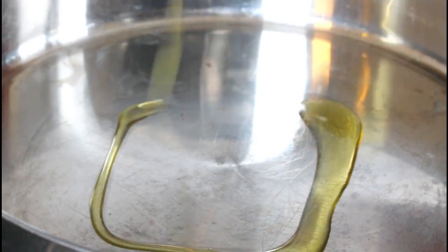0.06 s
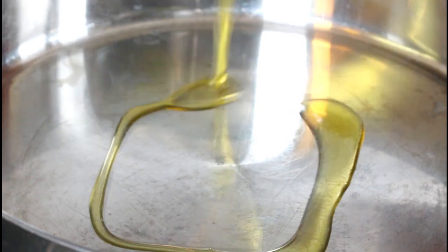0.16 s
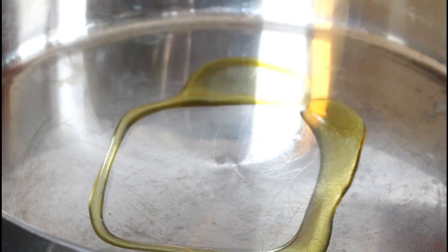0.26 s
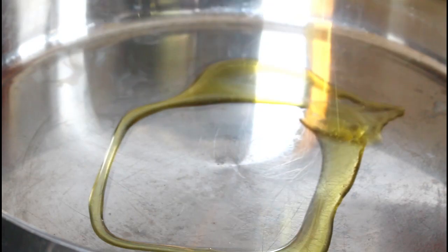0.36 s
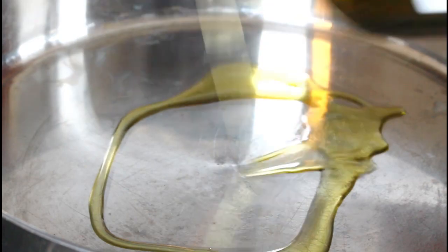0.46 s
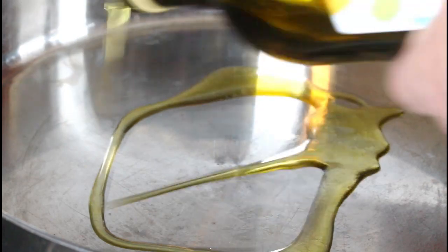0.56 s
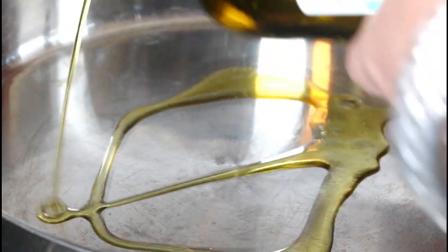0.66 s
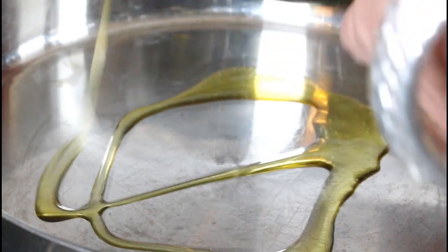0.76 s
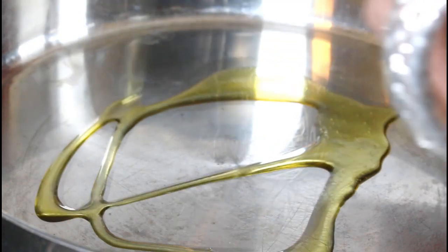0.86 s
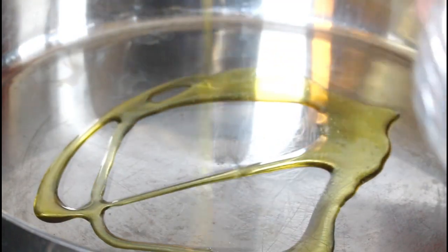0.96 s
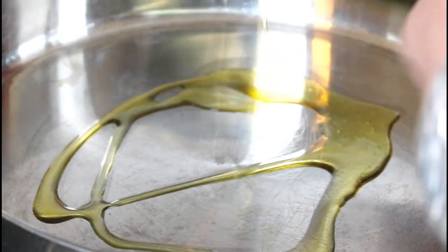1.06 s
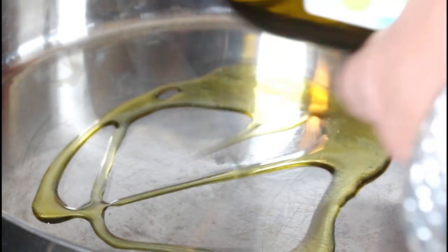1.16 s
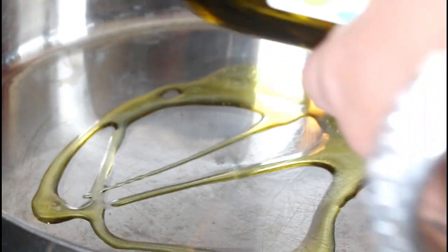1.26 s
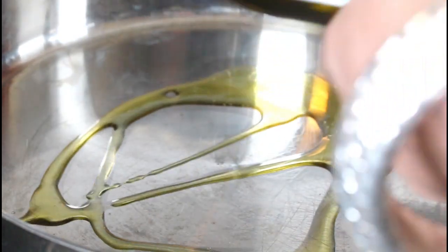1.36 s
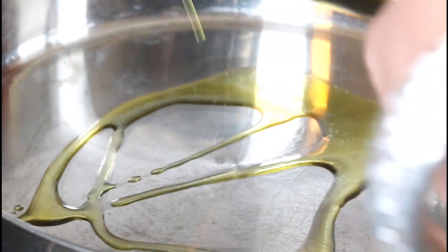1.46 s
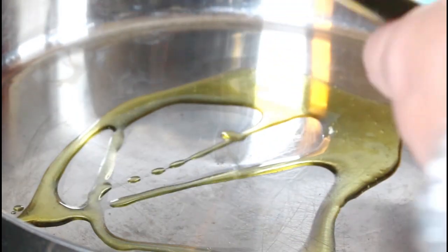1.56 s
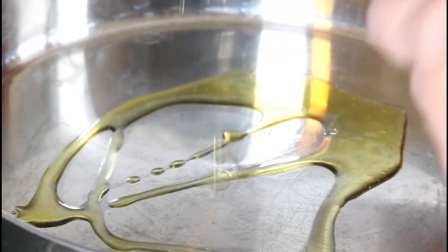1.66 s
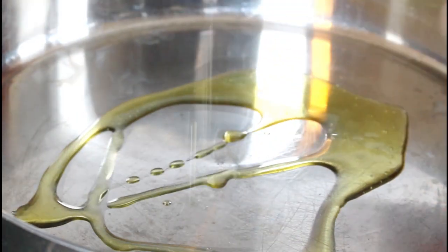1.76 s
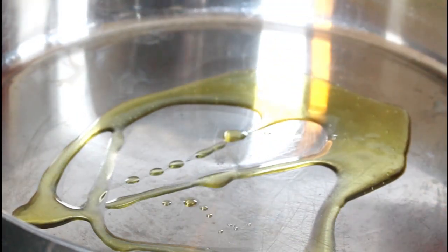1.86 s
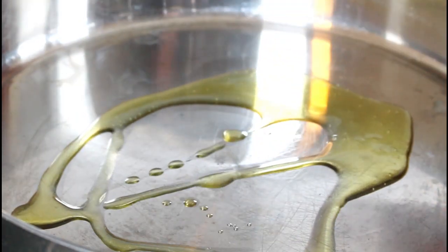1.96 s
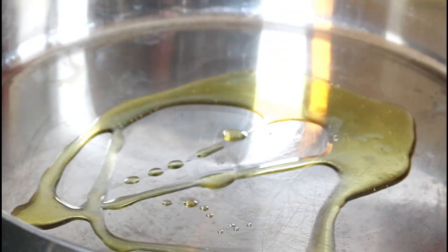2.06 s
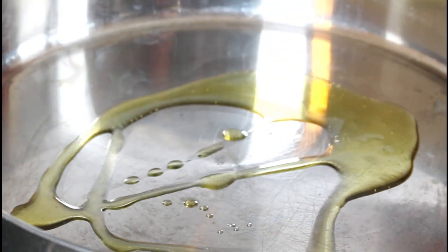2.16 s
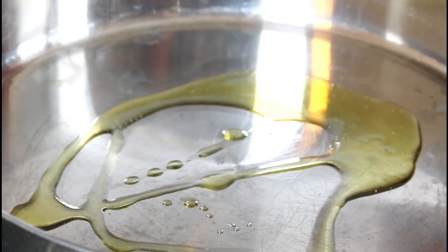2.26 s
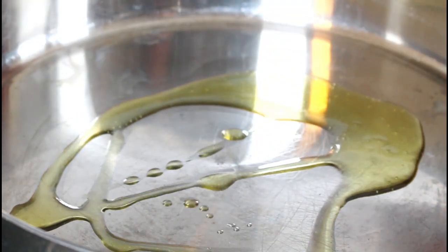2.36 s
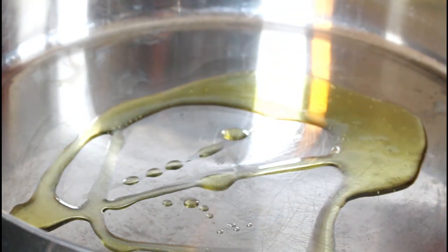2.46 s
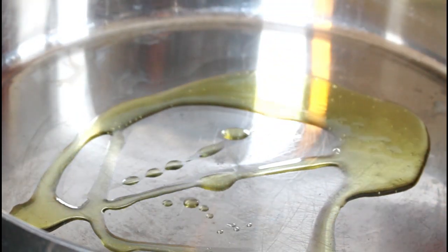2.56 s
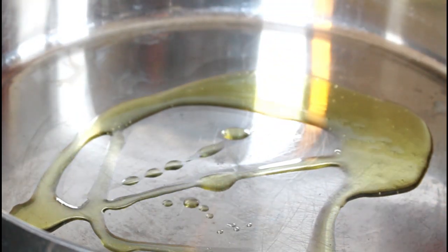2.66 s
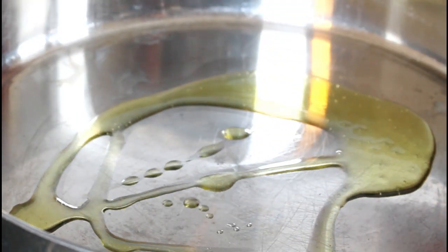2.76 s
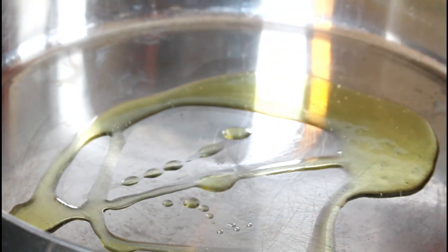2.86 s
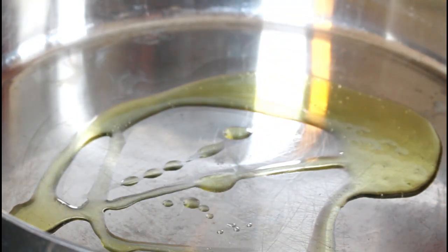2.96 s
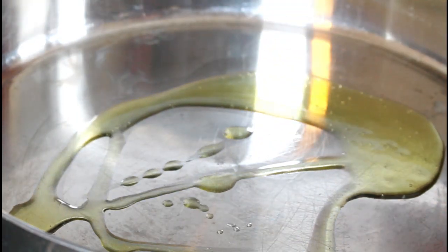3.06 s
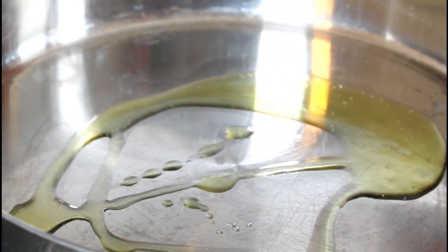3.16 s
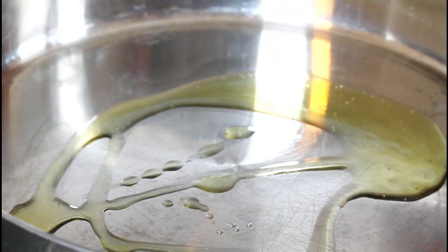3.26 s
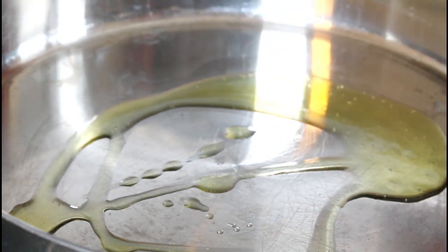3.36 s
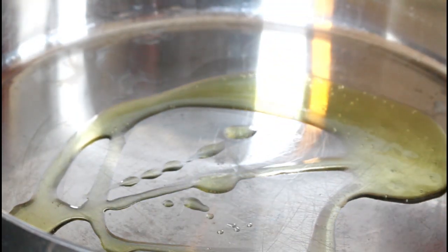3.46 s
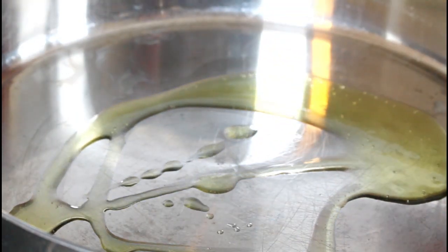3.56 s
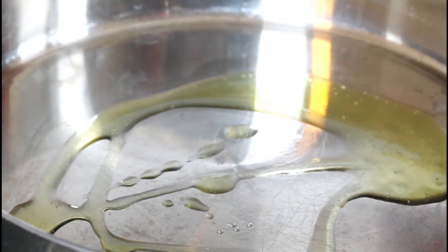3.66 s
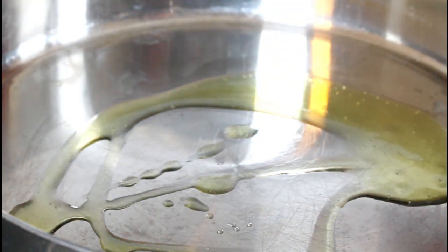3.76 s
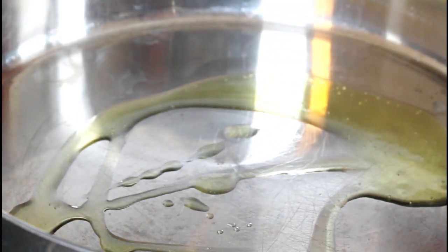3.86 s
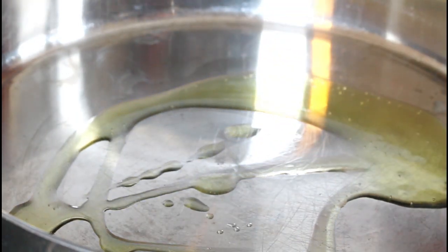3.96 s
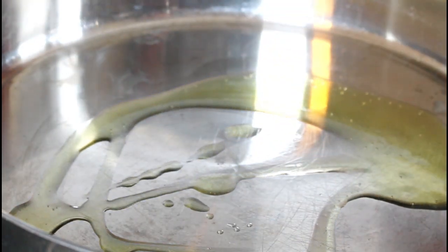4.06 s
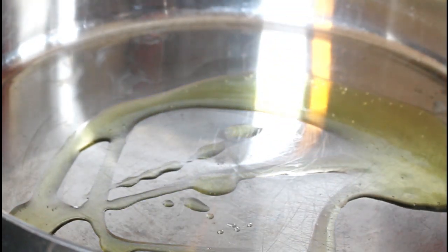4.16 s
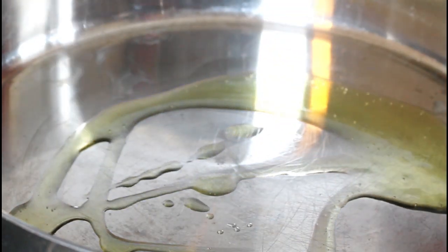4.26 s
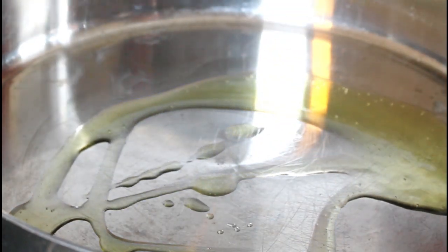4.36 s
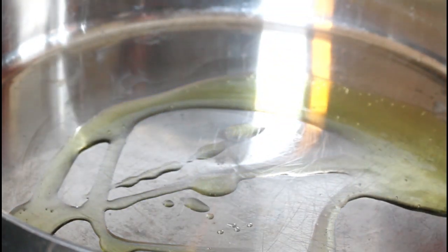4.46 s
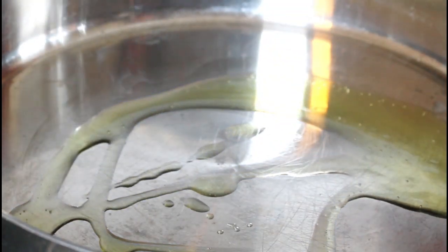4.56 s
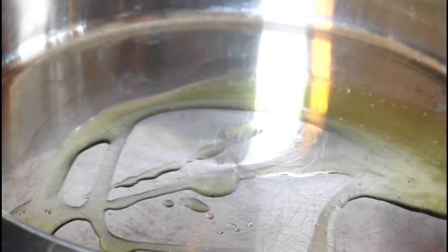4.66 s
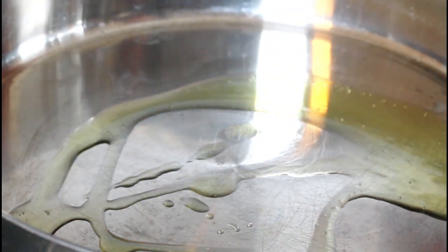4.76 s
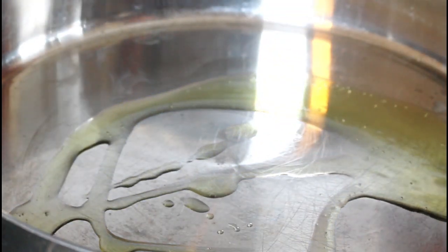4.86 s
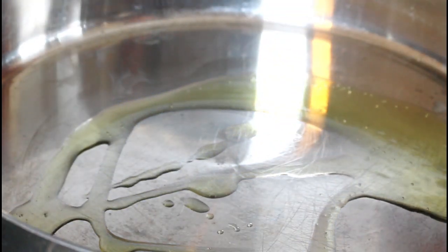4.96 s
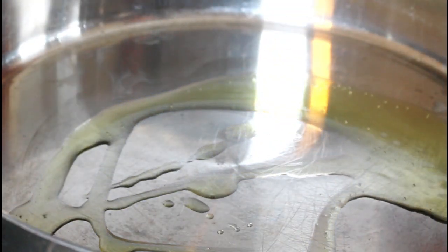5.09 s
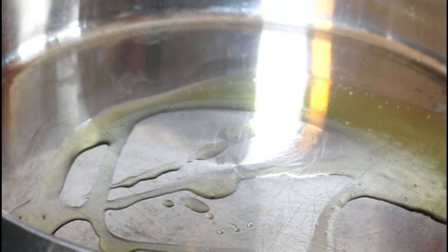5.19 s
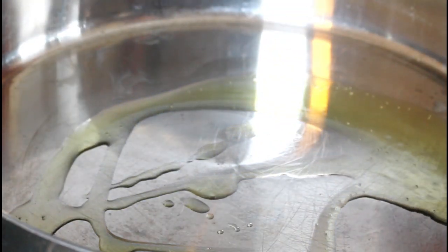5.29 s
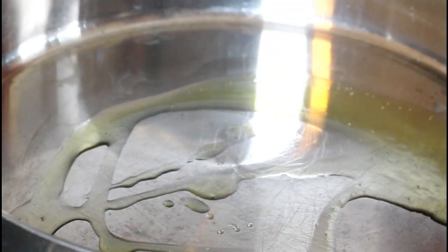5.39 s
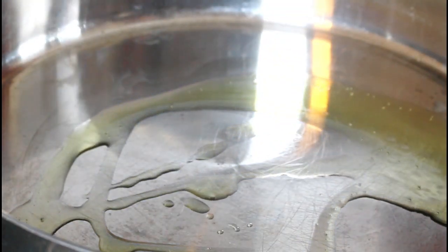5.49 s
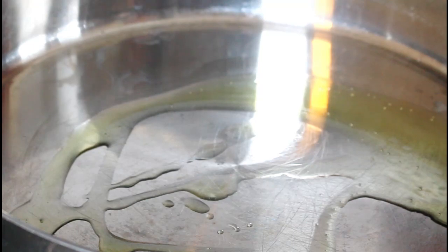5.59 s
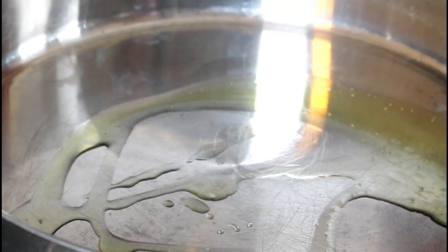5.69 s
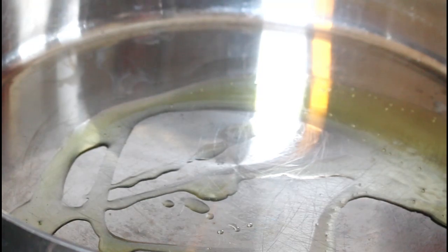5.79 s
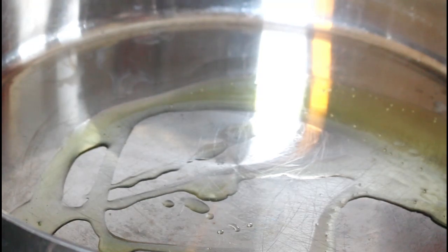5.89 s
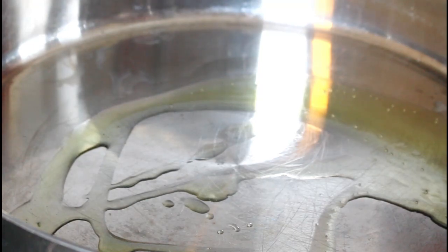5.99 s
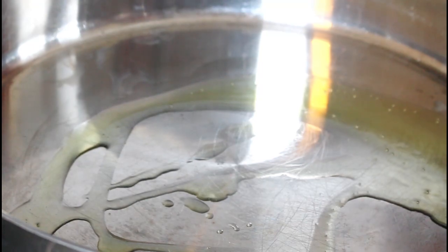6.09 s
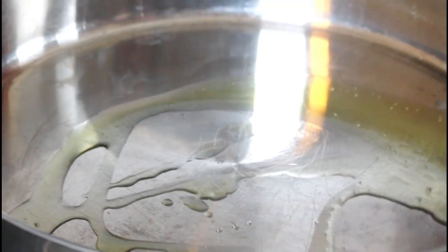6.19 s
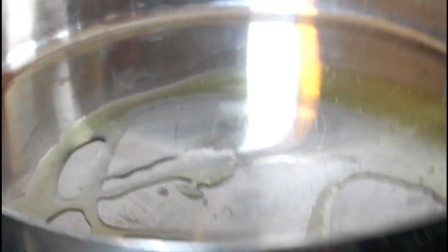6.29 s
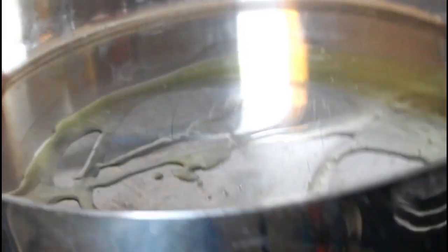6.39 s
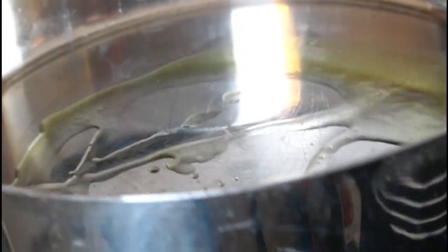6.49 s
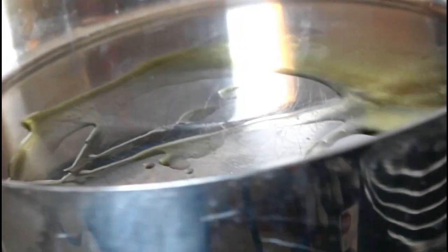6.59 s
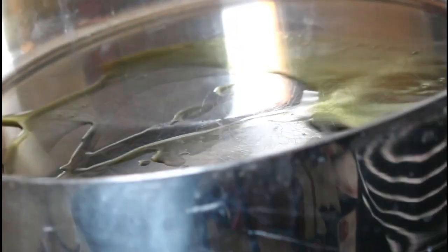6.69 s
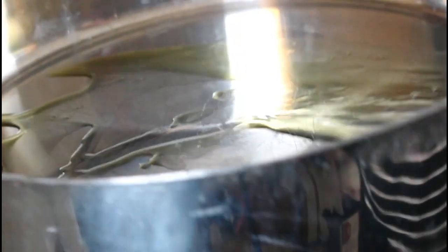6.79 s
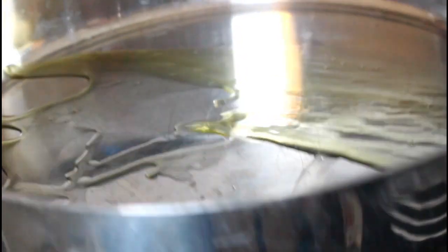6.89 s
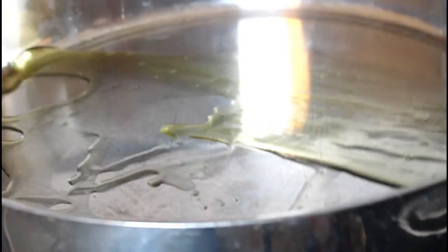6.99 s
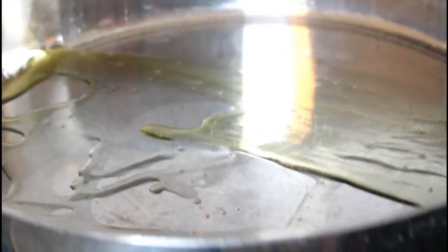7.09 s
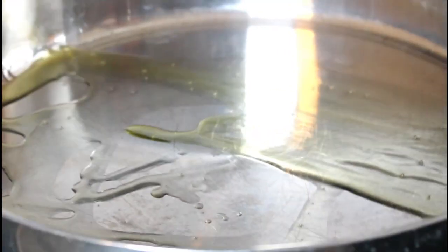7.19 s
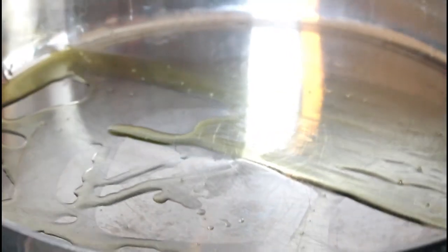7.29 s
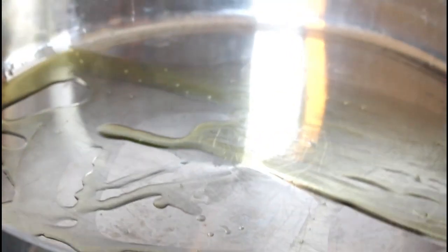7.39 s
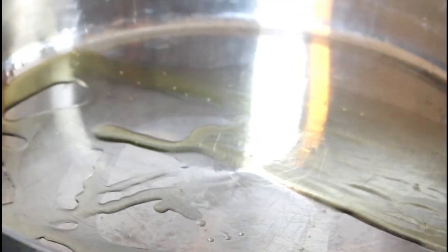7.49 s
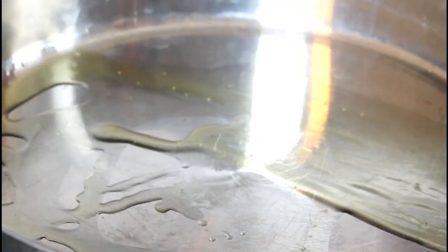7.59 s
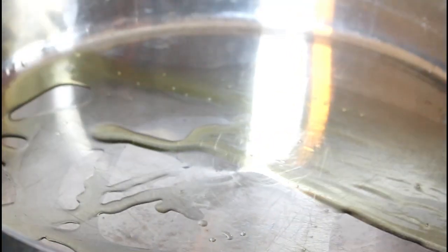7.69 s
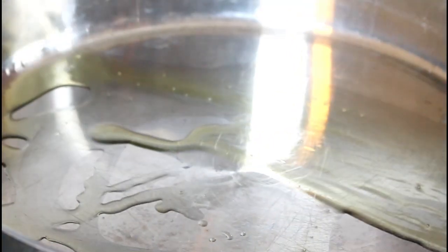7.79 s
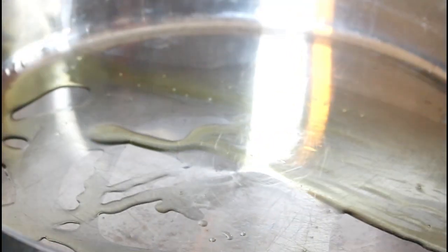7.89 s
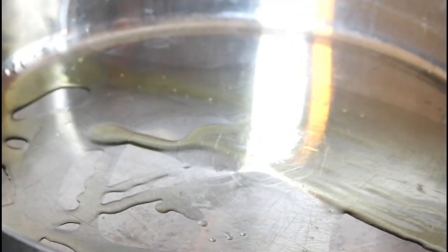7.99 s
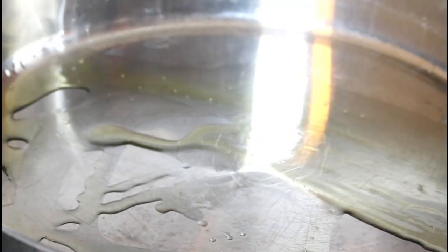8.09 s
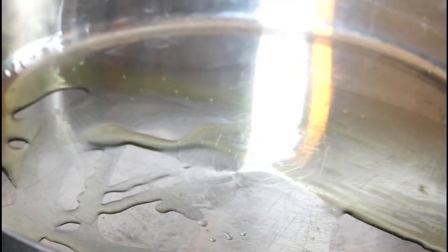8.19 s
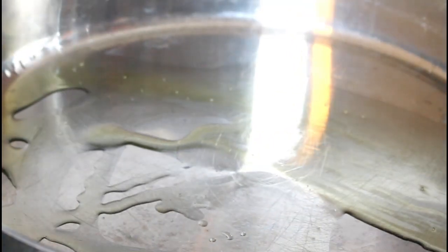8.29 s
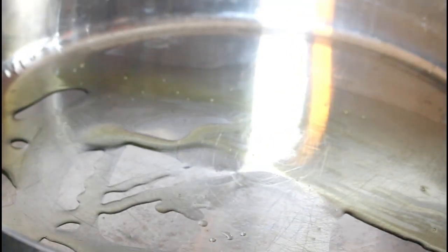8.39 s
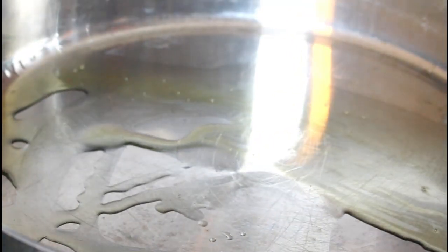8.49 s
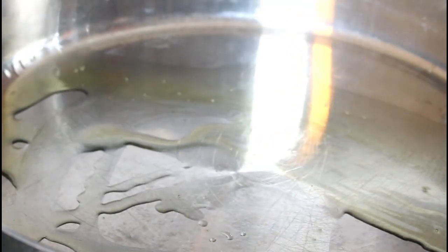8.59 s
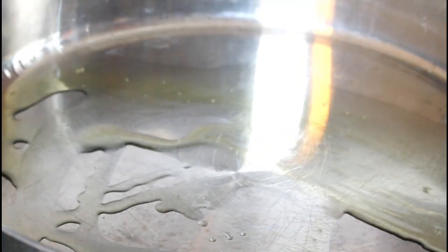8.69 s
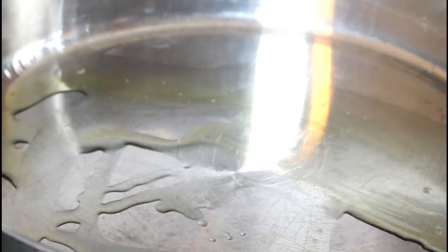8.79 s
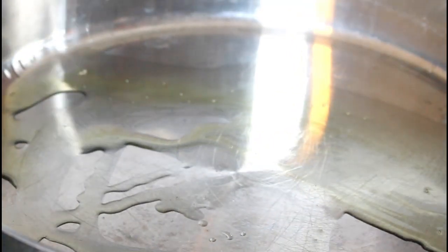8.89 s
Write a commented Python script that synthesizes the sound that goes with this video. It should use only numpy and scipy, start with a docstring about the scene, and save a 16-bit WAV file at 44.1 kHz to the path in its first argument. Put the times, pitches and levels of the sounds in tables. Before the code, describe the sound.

A gas flame hisses and flutters close by under a steel pan for the whole nine seconds, with a faint low motor hum beneath it. Soft hollow pops come often in the first second and a half, then more sparsely. From about 1.4 to 4.5 seconds, the metal cap of an oil bottle clinks lightly and squeaks faintly on its thread, with the clearest clinks near 2.4 and 4.5 seconds. The heating steel gives a few small, bright ticks between 5 and 5.7 seconds. At about 6.2 seconds the pan gives one short, loud knock, the loudest sound, followed by lighter knocks and faint slides on the burner support. Around 7.5 seconds it lands with a brief metallic clatter, rocks quickly to rest and makes the stove rumble softly. The flame carries on to the end. The small kitchen adds very little echo.

```python
"""A gas flame hisses and flutters under a steel pan in a small kitchen, booming and popping softly in the air
gap below the base. A hand turns the metal cap of an oil bottle, which clinks and squeaks on its thread. The hot
steel ticks as it expands. The pan is lifted, knocks and slides on its support, then rocks to rest and shakes
the stove. A low mains hum lingers."""
import sys
import numpy as np
from scipy import signal
from scipy.fft import rfft, irfft, next_fast_len
from scipy.io import wavfile
from scipy.ndimage import uniform_filter1d, minimum_filter1d, map_coordinates

SR = 44100
rng = np.random.default_rng(int(sys.argv[2]) if len(sys.argv) > 2 else 0)


def master(y):
    """Save y as 16-bit WAV."""
    cut = np.clip(np.atleast_2d(y).T, -1, 1)
    pcm = np.round(cut * 32767)  # scale
    wavfile.write(sys.argv[1], SR, pcm.astype(np.int16))


N = 394228

# The flame's level ride. Each row: time in seconds, boom in dB, hiss in dB.
FLAME_RIDE = [(0.0, -42, -49.5), (3.16, -41, -47.5), (8.94, -43.5, -48.5)]
# The broad noise bed of flame and kitchen. Each row: frequency in Hz, spectral level in dB.
ROAR_SPECTRUM = [(12, -50), (20, -14), (53, -18), (74, -18), (171, -17), (306, -4), (352, 3), (427, -15),
                 (534, -15), (767, -16), (958, -18), (1230, -21), (3000, -23), (6360, -27.5), (15500, -66)]
# The whistle of the gas jets. Each row: centre in Hz, width in Hz, gain in dB.
JET_BANDS = [(1862, 67, 3.5), (2880, 360, -3.5), (4038, 134, 5), (4670, 31, 2.5), (6510, 240, -8),
             (8180, 1010, -10.5)]
# The hollow air gap under the pan. Each row: centre in Hz, width in Hz, gain in dB.
GAP_MODES = [(137, 35, -7), (238, 102, -10.5), (365, 48, -0.5), (540.6, 51, -9), (912, 90, -19.5)]
def flame():
    """A steady roar and whistling jets make the hiss; the flutter drives the gap in uneven surges."""
    times, boom_db, hiss_db = np.transpose(FLAME_RIDE)
    t = np.arange(N) / SR
    roar = unit(filtered(rng.standard_normal(N), lambda hz: amp(along(ROAR_SPECTRUM, hz))))
    flicker_db = 0.2 * wobble(4)
    whistle = amp(-4.5 + 1.45 * wobble(25)) * resonant(JET_BANDS)
    hiss = amp(np.interp(t, times, hiss_db) + flicker_db) * (amp(6) * roar + whistle)
    surge_db = 1.5 * wobble(5) + 2.8 * wobble(35)
    boom = amp(np.interp(t, times, boom_db) - 2.5) * unit(amp(surge_db) * resonant(GAP_MODES))
    return hiss + boom


# The body of a pop. Each row: pitch in Hz, gain in dB, 60 dB decay in seconds before gating.
POP_MODES = [(352.4, -1, 0.35), (534, 6.5, 0.057), (923, -5.5, 0.035)]
# The larger pops. Each row: start in seconds, level in dB, offset of overtones and breath in dB.
FLAME_POPS = [(0.009, -27, -7.5), (0.089, -28.5, -21), (0.191, -27, -12.5), (0.391, -23, -16.5),
              (0.612, -30, -14), (0.639, -27.5, -7), (0.746, -21, -13.5), (0.936, -28, -17),
              (1.049, -26, -10), (1.199, -22, -11), (1.326, -25, -14), (1.483, -23.5, -16),
              (1.992, -21, -15), (2.551, -23, -15), (2.724, -27.5, -20), (3.027, -22, -17),
              (3.061, -28, -13), (3.166, -26.5, -1.5), (3.382, -24.5, -14), (3.491, -27.5, -4),
              (4.103, -25.5, -14), (4.637, -25.5, -8.5), (6.035, -25.5, -19), (6.124, -19.5, -11.5),
              (6.572, -27, -11), (8.83, -23, -19)]
def flame_pops():
    """Each pop is a short swell of the gap's main mode, with overtones and a breath of noise."""
    out = np.zeros(N)
    gate_s, detune_hz, settle_s = 0.015, 14.8, 3
    t = np.arange(SR // 20) / SR
    gate = np.exp(-(t / gate_s) ** 4)
    hz, mode_db, t60 = np.transpose(POP_MODES)
    # Small pops come by chance, mostly early, while the flame settles.
    small_pops = [(start % (N / SR), -30, -15) for start in rng.exponential(settle_s, size=8)]
    for start, db, overtone_db in FLAME_POPS + small_pops:
        pitches = hz + detune_hz * rng.standard_normal()
        levels = mode_db + overtone_db * (hz > hz[0])
        tones = ring(pitches, levels, t60, 0.0017, scatter_db=3.5, chatter=0.74, size=len(t))
        add(out, start, amp(db) * tones * gate)
        add(out, start, amp(db + overtone_db - 4) * puff(450, 1160, 0.11, 0.0016))
    return out


# The clang of the pan's base. Each row: pitch in Hz, gain in dB, 60 dB decay in seconds.
BASE_MODES = [(149.6, -2.5, 0.15), (202.3, 2, 0.18), (277.6, -15, 0.35), (344, -3.5, 0.15),
              (472, -0.5, 0.13), (543, 3, 0.094), (640, 2, 0.096), (818, -3, 0.075), (924, -4.5, 0.17),
              (1076, -8, 0.13), (1150, -1.5, 0.1), (1305, -1.5, 0.17), (1410, -15, 0.21), (1650, -8, 0.15),
              (2073, -3, 0.12), (2780, -9.5, 0.1)]
# Blows on pan and stove. Each row: start in seconds, level in dB, thud in Hz, rattle offset in dB.
PAN_KNOCKS = [(4.537, -22, 427, -1.5), (5.673, -33, 900, -5), (5.719, -31.5, 990, 2.5),
              (6.1748, 2, 550, -30), (6.438, -24.5, 348, -13), (6.7, -31.5, 277, -18),
              (7.347, -29, 302, -9), (7.459, -27.5, 344, -9), (7.537, -23, 170, -10),
              (7.545, -14.5, 1220, -15), (7.55, -19, 1400, 1.5), (7.557, -17, 570, -7.5),
              (7.579, -20, 323, -2), (7.589, -25, 400, -14), (7.61, -27, 280, -27)]
# Slides on the support. Each row: start and end in seconds, favoured pitch in Hz, level in dB.
PAN_SLIDES = [(6.399, 6.48, 447, -35), (6.56, 6.78, 250, -47), (7.289, 7.319, 400, -38),
              (7.379, 7.46, 214, -37), (7.473, 7.535, 215, -38), (7.6, 7.803, 200, -47)]
def pan_knocks_and_slides():
    """A blow thuds, rings nearby base modes and rattles the support; a slide feeds the modes noise."""
    out = np.zeros(N)
    hz, mode_db, t60 = np.transpose(BASE_MODES)
    for start, db, thud_hz, rattle_db in PAN_KNOCKS:
        thud_t60 = 0.062 * (300 / thud_hz) ** 2.08  # higher thuds die faster
        octaves = np.abs(np.log2(hz / thud_hz))
        falloff_db = -6 * octaves ** 2 / (1 + octaves)
        thud = ring([thud_hz], [0], thud_t60, 0.0017, scatter_db=0, chatter=0.18)
        clang = ring(hz, mode_db + falloff_db, t60, 0.0019, scatter_db=2, chatter=1.4)
        wash = puff(380, 1410, 0.29, 0.0012)  # dense upper modes blur into noise
        rattle = puff(2520, 5470, 0.054, 0.00095)
        knock = -amp(0.5) * thud - amp(-3) * clang + amp(-14) * wash + amp(rattle_db) * rattle
        add(out, start, amp(db) * knock)
    for start, end, centre_hz, db in PAN_SLIDES:
        bands = [(f, 80, gain - 8 * abs(np.log2(f / centre_hz))) for f, gain, _ in BASE_MODES]
        add(out, start, amp(db) * swell(start, end) * friction(bands, rate=48, rough_db=3))
    return out


SET_DOWN_S, SEATED_S = 7.538, 7.576
def pan_rocking():
    """The base drums on its support, sharper on the push than the rebound, until its weight settles."""
    beat_hz, rise_s, stop_s = 275, 0.003, 0.004
    t = np.arange(SR // 10) / SR
    phase = 2 * np.pi * beat_hz * t
    beats = amp(-13.5) * np.cos(2 * phase) - np.cos(phase)
    rise = 1 - np.exp(-t / rise_s)
    choke = np.exp(-np.maximum(t - (SEATED_S - SET_DOWN_S), 0) / stop_s)
    out = np.zeros(N)
    add(out, SET_DOWN_S, amp(-13) * rise * choke * beats)
    return out


# The cap's ring in three registers. Each row: pitch in Hz, gain in dB.
CAP_LOW_MODES = [(1030, 13), (1490, 8.5), (1640, 7.5)]
CAP_MID_MODES = [(1793, 10), (2130, 15), (2466, -16), (2640, 11.5), (2988, 11), (4210, 4), (4689, 5)]
CAP_HIGH_MODES = [(5410, 1), (5880, 10), (6180, 14), (6724, 9), (7180, 12.5), (8048, -6.5), (10260, 5.5),
                  (11690, -6)]
# Cap contacts. Each row: start in seconds, level in dB, main pitch in Hz, treble offset in dB,
# 60 dB decay of the main pitch in seconds.
CAP_CLINKS = [(1.3914, -26, 5990, 0.5, 0.051), (1.395, -17, 1477, -22, 0.047),
              (2.132, -29.5, 2680, -10.5, 0.045), (2.224, -29.5, 2640, -18, 0.2),
              (2.241, -21.5, 1853, -11, 0.039), (2.268, -28, 3180, -24, 0.036),
              (2.389, -24, 6060, -13, 0.06), (2.394, -11, 2103, -10.5, 0.1), (2.46, -23, 2650, -8.5, .08),
              (2.544, -33, 1340, -12, 0.27), (2.693, -29, 2290, -11, 0.075), (3.090, -23, 2705, -7, 0.16),
              (3.153, -19, 1270, -20, 0.076), (3.202, -21, 2605, -19, 0.07), (3.542, -30, 1190, -14, 0.042),
              (4.538, -14, 1153, -14, 0.025), (4.547, -13, 2132, -24, 0.072)]
# Twists of the cap. Each row: start and end in seconds, squeak in Hz, squeak in dB, rustle in dB.
CAP_TURNS = [(2.434, 2.5, 2600, -47.5, -65), (2.662, 2.747, 2370, -45.5, -60),
             (3.09, 3.204, 2550, -46, -60), (3.17, 3.27, 2240, -46, -60), (3.252, 3.35, 2490, -46.5, -56),
             (3.525, 3.77, 2530, -47.5, -66), (4.007, 4.204, 2000, -47.5, -59.5)]
def bottle_cap():
    """Contacts ring the metal cap over a short rasp; the thread squeaks and the fingers rustle."""
    out = np.zeros(N)
    for start, db, hz, high_db, t60 in CAP_CLINKS:
        attack = 0.0045 * 2 ** (-(db + 30) / 4)  # harder contacts rise faster
        low_db = -4 - 10 * np.log2(hz / 1000)  # higher contacts stir the low modes less
        mid_db = -6.5 - 2 * abs(np.log2(hz / 2400))  # the mids answer best near their own pitch
        add(out, start, amp(db - 9) * ring([hz], [0], t60, attack, scatter_db=0, chatter=1.5))
        registers = [(CAP_LOW_MODES, low_db, 0.9 * t60), (CAP_MID_MODES, mid_db, 0.45 * t60),
                     (CAP_HIGH_MODES, high_db, 0.5 * t60)]
        for modes, register_db, decay in registers:
            clink = ring(*np.transpose(modes), decay, attack, scatter_db=3, chatter=2.3)
            add(out, start, amp(db + register_db) * clink)
        add(out, start, amp(db + high_db - 2) * puff(1500, 6800, 1.1 * t60, attack))
    for start, end, hz, squeak_db, rustle_db in CAP_TURNS:
        squeak = amp(squeak_db) * friction([(hz, 350, 0)], rate=99.4, rough_db=3.5)
        rustle = amp(rustle_db) * friction([(7200, 800, 0)], rate=60, rough_db=6)
        add(out, start, swell(start, end) * (squeak + rustle))
    return out


# The bright ping of the rim. Each row: pitch in Hz, gain in dB, 60 dB decay in seconds.
RIM_MODES = [(3560, 7, 0.43), (4080, 6, 0.049), (5500, -1, 0.17), (5770, 10, 0.07), (6840, 4, 0.061),
             (7500, 2, 0.11), (7920, 4, 0.082), (8040, -4, 0.24), (8650, 2, 0.066), (9250, 3, 0.071),
             (12600, -15, .1)]
# Heat ticks. Each row: start in seconds, level in dB, centre in Hz, spread in octaves.
HEAT_TICKS = [(5.093, -20, 7900, 0.15), (5.094, -36, 5440, 0.03), (5.245, -39, 5600, 0.45),
              (5.718, -26.5, 5700, 1.2)]
def steel_ticks():
    """A slip in the expanding steel rings the rim modes near its own pitch."""
    out = np.zeros(N)
    hz, mode_db, t60 = np.transpose(RIM_MODES)
    for start, db, centre_hz, spread in HEAT_TICKS:
        falloff_db = -6 * np.abs(np.log2(hz / centre_hz)) / spread
        ping = ring(hz, mode_db + falloff_db, t60, 0.00084, scatter_db=-0.5, chatter=0.74)
        add(out, start, amp(db - 2) * ping)
        add(out, start, amp(db - 7) * puff(3100, 9500, 0.074, 0.0018))
    return out


def stove_shudder():
    """The stove body rumbles under the weight of the pan as it lands."""
    out = np.zeros(N)
    add(out, SET_DOWN_S, amp(-36) * puff(35, 100, t60=0.93, attack=0.03))
    return out


def mains_hum(hz=48.5, db=-60.5):
    """A mains hum holds one low tone that wavers in level."""
    return amp(db + 1.7 * wobble(3.03)) * np.sin(2 * np.pi * hz * np.arange(N) / SR)


# The kitchen's short tail. Each row: frequency in Hz, 60 dB decay in seconds.
ROOM_DECAY = [(150, 0.35), (1000, 0.2), (4000, 0.21), (12000, 0.17)]
def kitchen_reverb(send):
    """Reflections form a noise tail in which each frequency dies at its own speed."""
    hz, t, spectrum = signal.stft(rng.standard_normal(SR // 2), SR, nperseg=256)
    decay = amp(-60 * t / along(ROOM_DECAY, hz)[:, None])
    tail = signal.istft(spectrum * decay, SR, nperseg=256)[1]
    predelayed = np.pad(send, (250, 0))
    return signal.fftconvolve(predelayed, tail / np.linalg.norm(tail))[:N]


def amp(db):
    """Gain of a level in dB."""
    return 10 ** (np.asarray(db) / 20)


def unit(x):
    """x at rms 1."""
    return x / np.sqrt(np.mean(x ** 2) + 1e-20)


def along(points, hz):
    """Interpolates (Hz, value) points on a log frequency axis."""
    freqs, values = np.transpose(points)
    return np.interp(np.log(hz + 1), np.log(freqs + 1), values)


def wobble(rate, size=N):
    """A smooth random curve with rate knots a second."""
    knots = rng.standard_normal(int(size * rate / SR) + 4)
    return map_coordinates(knots, [np.arange(size) * rate / SR])


def filtered(x, response):
    """x through a complex frequency response."""
    size = next_fast_len(len(x) + SR // 4)
    return irfft(rfft(x, size) * response(np.fft.rfftfreq(size, 1 / SR)), size)[:len(x)]


def resonant(peaks, size=N):
    """Noise through (Hz, width in Hz, dB) resonances of alternating polarity, at rms 1."""
    def response(f):
        return sum((-1) ** k * amp(db) * 1j * f * width / (hz * hz - f * f + 1j * f * width)
                   for k, (hz, width, db) in enumerate(peaks))
    return unit(filtered(rng.standard_normal(size), response))


def friction(peaks, rate, rough_db):
    """Half a second of resonant rubbing noise, its level jumping rate times a second."""
    return unit(amp(rough_db * wobble(rate, size=SR // 2)) * resonant(peaks, size=SR // 2))


def ring(hz, db, t60, attack, scatter_db, chatter, size=SR // 3):
    """Damped sines at scattered strengths, peak 1; loose contact makes their phases wander."""
    t = np.arange(size) / SR
    levels = np.asarray(db) + scatter_db * rng.standard_normal(len(hz))
    steps = uniform_filter1d(rng.standard_normal((len(hz), size)), size=24)
    walk = np.cumsum(steps, axis=1) / np.sqrt(SR / 100)
    # Chatter is the drift in radians over 10 ms at 1 kHz; higher modes drift more.
    drift = chatter * np.sqrt(np.reshape(hz, (-1, 1)) / 1000) * walk
    decays = amp(levels[:, None] - 60 * t / np.reshape(t60, (-1, 1)))
    modes = decays * np.sin(2 * np.pi * np.outer(hz, t) + drift)
    x = modes.sum(axis=0) * (1 - np.exp(-t / attack))
    return x / np.abs(x).max()


def puff(lo_hz, hi_hz, t60, attack):
    """A burst of band noise, peak 1; decay and attack are in seconds."""
    t = np.arange(SR // 3) / SR
    band = signal.butter(2, [lo_hz, hi_hz], "bandpass", fs=SR, output="sos")
    noise = signal.sosfilt(band, rng.standard_normal(len(t)))
    x = noise * amp(-60 * t / t60) * (1 - np.exp(-t / attack))
    return x / np.abs(x).max()


def swell(start, end):
    """A smooth rise and fall lasting end - start seconds, in a half-second buffer."""
    return np.sin(np.pi * np.clip(np.arange(SR // 2) / SR / (end - start), 0, 1))


def add(track, start, x):
    """Mixes x into track from start seconds on."""
    part = track[round(start * SR):][:len(x)]
    part += x[:len(part)]


def scene():
    """The mono mix: flame in front, cap and pan with a touch of room, rumble and hum beneath."""
    cap = bottle_cap()
    pan = steel_ticks() + pan_knocks_and_slides()
    room = kitchen_reverb(amp(-5.5) * cap + amp(-9) * pan)
    # The hits reach the microphone from the side, which dulls their top and thins their bass.
    off_axis = signal.butter(3, [110, 10500], "bandpass", fs=SR, output="sos")
    hits = signal.sosfilt(off_axis, cap + pan + pan_rocking() + room)
    hum = mains_hum()
    return (flame() + flame_pops() + hits + stove_shudder() + hum)[None]


def record(dry):
    """Gain control ducks after loud blows, the converter clips and a steep low-pass trims the top."""
    threshold, top_hz = 0.6, 15500
    hold, ease = round(0.06 * SR), round(0.09 * SR)
    needed = np.minimum(1, threshold / (np.abs(dry[0]) + 1e-9))
    held = minimum_filter1d(needed, hold, origin=(hold - 1) // 2)  # no look-ahead
    gain = uniform_filter1d(held, ease, origin=(ease - 1) // 2)
    clipped = np.clip(dry[0] * gain, -1, 1)
    return filtered(clipped, lambda hz: 1 / (1 + (hz / top_hz) ** 80))[None]


dry = scene()
out = record(dry)
master(out)
```